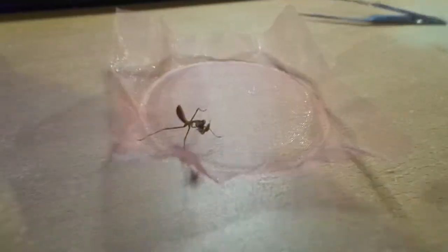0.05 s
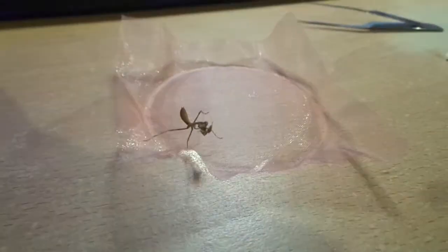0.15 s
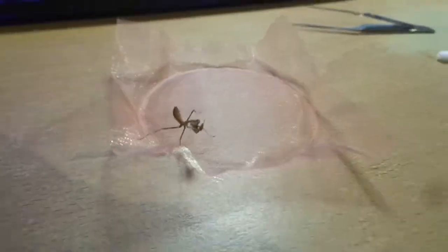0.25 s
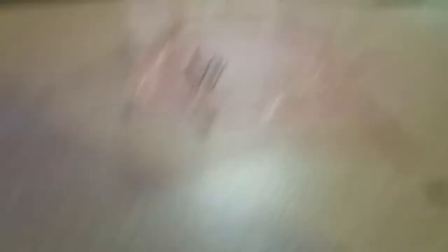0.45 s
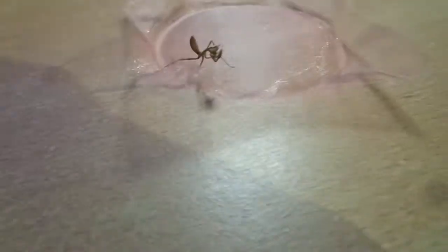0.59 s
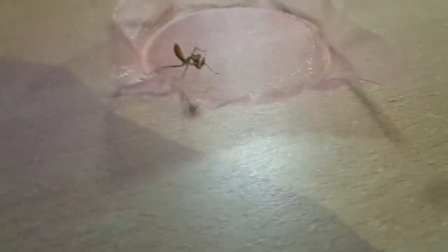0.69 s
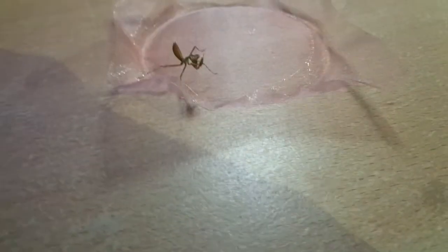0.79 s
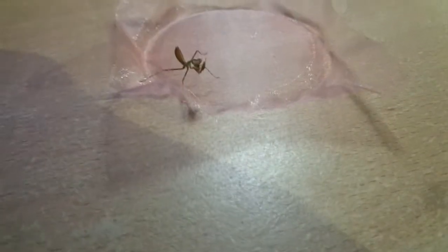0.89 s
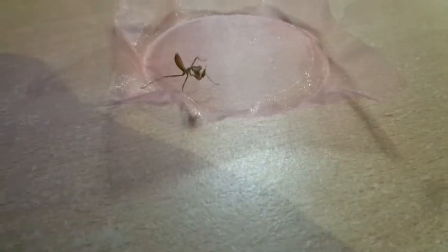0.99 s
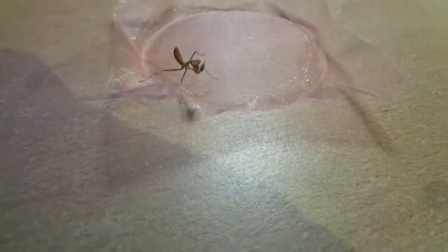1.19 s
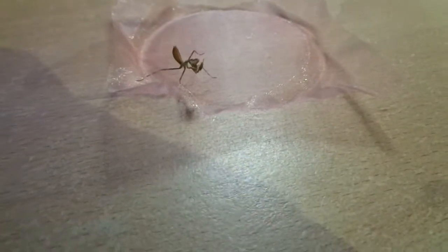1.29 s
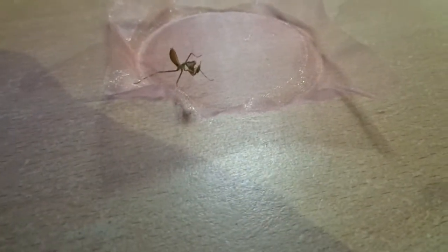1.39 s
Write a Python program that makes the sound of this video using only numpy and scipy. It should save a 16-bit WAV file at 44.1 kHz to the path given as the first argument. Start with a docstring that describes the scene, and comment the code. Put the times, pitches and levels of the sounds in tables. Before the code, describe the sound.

Dry plastic handling clicks come straight through a camera's body to its microphone: a soft knock, a few small snaps with finger rubbing, then a louder click and tiny rattle. Afterwards only faint hiss and hum remain in the quiet room.

```python
"""Camera shifted in the grip

A handheld camera's plastic casing ticks, snaps and rattles; fingers knock softly and slide on it.
All of this reaches the microphone through the shell, so it is dry.
Behind it: a quiet room, faint mains hum and microphone hiss."""
import sys
import numpy as np
from scipy import signal
from scipy.fft import rfft, irfft, next_fast_len
from scipy.io import wavfile

SR = 44100
rng = np.random.default_rng(int(sys.argv[2]) if len(sys.argv) > 2 else 0)


def store_wav(level_fs):
    """Save 16-bit WAV to argv[1]."""
    pcm = np.round(np.clip(np.atleast_2d(level_fs), -1, 1) * 32767)
    wavfile.write(sys.argv[1], SR, pcm.T.astype(np.int16))


N = 63945

# Room air and microphone hiss. Each row: frequency in Hz, relative density in dB.
AIR_SPECTRUM = [(15, -54), (25, -19), (54, -16), (90, -17.5), (109, -13.5), (181, -7.5), (202, -8),
                (301, -2.5), (344, -3.5), (438, -5.5), (543, -10.5), (604, -11.5), (879, -11.5),
                (1580, -16.5), (1860, -20), (2130, -17.5), (2300, -18.5), (2560, -16.5), (4040, -23),
                (12400, -26.5), (15000, -25.5)]
# Hum tones. Each row: frequency in Hz, rms level in dB.
HUM_TONES = [(120, -73.5), (211, -69.5)]
# Narrow resonances in the room noise. Each row: centre in Hz, width in Hz, rms level in dB.
ROOM_DRONES = [(296, 118, -64), (595.7, 22, -69), (1611, 98, -69), (2127, 17, -74.5), (12300, 150, -74)]
# Room reflections. Each row: frequency in Hz, gain in dB.
ROOM_EQ = [(500, 15.5), (1500, 10), (6000, -6), (15000, -24)]
# Finger slides. Each row: start, rise, hold and T60 in seconds, level in dB, treble in dB.
FINGER_SLIDES = [(0.231, 0.00085, 0.004, 0.06, -42, -4), (0.268, 0.023, 0.056, 0.3, -55.5, -5.5),
                 (0.369, 0.054, 0.015, 0.081, -48.5, -2.5), (0.43, 0.0047, 0.022, 0.048, -38.5, 7),
                 (0.459, 0.0027, .006, 0.17, -45.5, 5.5), (0.479, 0.0077, 0.0012, 0.013, -42, 2)]
# Friction spectra. Each row: frequency in Hz, relative gain in dB.
SLIDE_EQ = [(100, -40), (700, -3.5), (1300, -1.5), (1650, 1.5), (2300, 1), (3000, -1), (4300, -2),
            (6500, -4.5), (9000, -10.5), (12000, -12), (15000, -10)]
SWISH_EQ = [(300, -35), (1600, -20), (2800, -4), (3500, -9), (4150, 0), (4600, -1), (5200, 0),
            (6500, -10.5), (9000, -32), (15000, -25)]
# Contacts. Each row: start in seconds, gain in dB, treble in dB, rattle gain in dB.
CASING_CLICKS = [(.3487, -10.5, 1, -21), (.4283, 13, 2, -11), (.4388, 2.5, -10, -9), (.4438, 1.5, -8, -17),
                 (.4451, 0, 0, -11), (.4464, 9.5, -14, -13), (.4511, -5.5, 7, -15), (.4520, -2.5, 2.5, -8),
                 (.4585, -8, 3, -10), (.4891, -11.5, -0.5, -20)]
SEAM_SNAPS = [(.1401, -12.5, 2, -6), (.2352, -14, 12.5, -14), (.2355, 1.5, -7, -7), (.2542, 0.5, 2, -5),
              (.2569, -5.5, 10, 0.5), (.2575, -6, 10, -9), (.3085, -17.5, -17, -2)]
FINGER_KNOCKS = [(.0414, -10, 2, 6), (.0432, -11, -23, 0.5), (.0480, -12, 5, -0.5), (.4895, -4, 1.5, 0),
                 (.5015, -9, -24, -10)]
# Path through the shell per kind of contact. Each row: frequency in Hz, gain in dB.
CLICK_EQ = [(100, -41), (600, -32), (950, -15.5), (1270, -15.5), (1550, -2.5), (2300, -1), (3050, -8.5),
            (3550, -5.5), (4250, -11.5), (5400, -6.5), (7500, -6), (10000, -10.5), (12600, -18.5),
            (14000, -14), (16000, -32)]
SNAP_EQ = [(100, -35), (450, -34), (660, -25), (850, -21), (1400, -29), (1630, 0.5), (2050, -12),
           (2700, 1.5), (3300, -7.5), (3950, 3.5), (4550, -6), (5100, -6.5), (7200, -19), (11000, -16.5),
           (16000, -24)]
KNOCK_EQ = [(100, -34), (660, -21.5), (870, -5.5), (1050, -5.5), (1280, -8), (1550, 0), (1850, -10.5),
            (2300, -5), (2900, -13.5), (3500, -9.5), (5500, -33), (15000, -47)]
# After-rattle, duller than the push. Each row: frequency in Hz, gain in dB.
RATTLE_EQ = [(2500, 2.5), (6000, -5), (14000, -0.5)]

AIR_DB, ROOM_GAIN_DB, ROOM_T60_S = -54.5, -19, 0.087
BEND_DELAY_1KHZ_S, RATTLE_RISE_S = 0.000689, 0.00019
SHELF_START_HZ, SHELF_END_HZ, BAND_LIMIT_HZ = 3240, 7700, 15100


def amp(db):
    """Decibels to gain."""
    return 10 ** (np.asarray(db) / 20)


def unit_rms(x):
    """Scale to rms 1."""
    return x / np.sqrt(np.mean(x ** 2) + 1e-20)


def log_interp(points, hz):
    """Interpolate (Hz, value) points on a log frequency axis."""
    points_hz, values = np.transpose(points)
    return np.interp(np.log(hz + 1), np.log(points_hz + 1), values)


def filtered(x, response):
    """Apply a frequency response by FFT."""
    size = next_fast_len(N + SR // 2)
    hz = np.fft.rfftfreq(size, 1 / SR)
    return irfft(rfft(x, size) * response(hz), size)[..., :N]


def noise(response):
    """Coloured noise, rms 1."""
    return unit_rms(filtered(rng.standard_normal(N), response))


def colour(eq, treble_db=0):
    """Frequency response of an EQ table plus treble shelf."""
    shelf = [(SHELF_START_HZ, 0), (SHELF_END_HZ, treble_db)]
    return lambda hz: amp(log_interp(eq, hz) + log_interp(shelf, hz))


def minimum_phase(gain):
    """Causal response with this gain."""
    cepstrum = irfft(np.log(np.maximum(gain, 1e-6)))
    half = len(cepstrum) // 2
    cepstrum[1:half] *= 2
    cepstrum[half + 1:] = 0
    return np.exp(rfft(cepstrum))


def background():
    """Room air and hiss, hum, narrow drones."""
    t = np.arange(N) / SR
    hum = sum(amp(db) * np.sqrt(2) * np.sin(2 * np.pi * (hz * t + rng.random())) for hz, db in HUM_TONES)
    drones = sum(amp(db) * noise(lambda hz: 1 / (1 + (2 * (hz - centre_hz) / width_hz) ** 2))
                 for centre_hz, width_hz, db in ROOM_DRONES)
    air = amp(AIR_DB) * noise(lambda hz: colour(AIR_SPECTRUM)(hz) * (hz < BAND_LIMIT_HZ))
    return air + hum + drones


def room_reflections(x):
    """Faint, short, dull reverb."""
    t = np.arange(SR // 2) / SR
    tail = rng.standard_normal(len(t)) * amp(-60 * t / ROOM_T60_S)
    wet = signal.fftconvolve(x, tail / np.linalg.norm(tail))[:N]
    return amp(ROOM_GAIN_DB) * filtered(wet, colour(ROOM_EQ))


def friction(response, start_s, rise_s, hold_s, t60_s, grain_db=4):
    """One grainy stroke: rise, hold, release."""
    t = np.arange(N) / SR - start_s
    attack = np.clip(t / rise_s, 0, 1)
    release = amp(-60 * np.maximum(t - rise_s - hold_s, 0) / t60_s)
    slips = rng.standard_normal(N) * amp(grain_db * rng.standard_normal(N))
    return attack * release * unit_rms(filtered(slips, response))


def finger_slides():
    """Skin slides on the shell; one brighter swish follows the first snap."""
    slides = sum(amp(db) * friction(colour(SLIDE_EQ, treble_db), *timing_s)
                 for *timing_s, db, treble_db in FINGER_SLIDES)
    swish = friction(colour(SWISH_EQ), start_s=0.1405, rise_s=0.00097, hold_s=0.017, t60_s=0.15)
    return slides + amp(-49) * swish


def contacts(rows, eq, rattle_t60_s, size=8192):
    """One push and a short rattle each, coloured by the shell. Low bending waves arrive late."""
    out = np.zeros(N + size)
    t, hz = np.arange(size) / SR, np.fft.rfftfreq(size, 1 / SR)
    dispersion = np.exp(-4j * np.pi * BEND_DELAY_1KHZ_S * np.sqrt(1000 * hz))
    envelope = amp(-60 * t / rattle_t60_s) * (1 - np.exp(-t / RATTLE_RISE_S))
    for start_s, db, treble_db, rattle_db in rows:
        rattle = rng.standard_normal(size) * envelope
        rattle_spectrum = rfft(rattle / np.linalg.norm(rattle)) * colour(RATTLE_EQ)(hz)
        force = 1 + amp(rattle_db) * rattle_spectrum  # 1: flat spectrum of the push
        shell = minimum_phase(colour(eq, treble_db)(hz))
        out[round(start_s * SR):][:size] += amp(db) * irfft(force * shell * dispersion)
    return out[:N]


def casing():
    """Sharp plastic clicks, snaps of a seam that sticks and lets go, soft finger knocks."""
    clicks = contacts(CASING_CLICKS, CLICK_EQ, rattle_t60_s=0.015)
    snaps = contacts(SEAM_SNAPS, SNAP_EQ, rattle_t60_s=0.011)
    knocks = contacts(FINGER_KNOCKS, KNOCK_EQ, rattle_t60_s=0.027)
    return clicks + snaps + knocks


def scene():
    """One microphone feeds both channels."""
    handling = casing() + finger_slides()
    return np.tile(handling + room_reflections(handling) + background(), (2, 1))


def record(dry):
    """Camera band limit: brick-wall low-pass."""
    return filtered(dry, lambda hz: hz < BAND_LIMIT_HZ)


dry = scene()
out = record(dry)
store_wav(out)
```